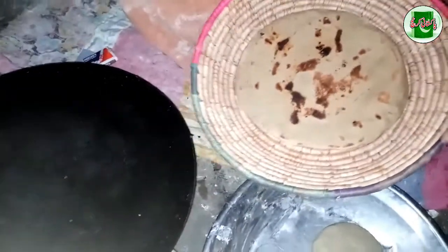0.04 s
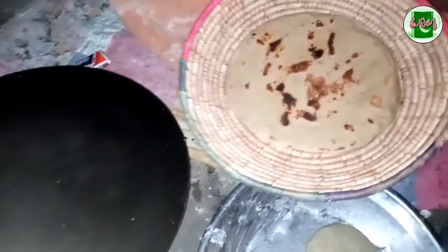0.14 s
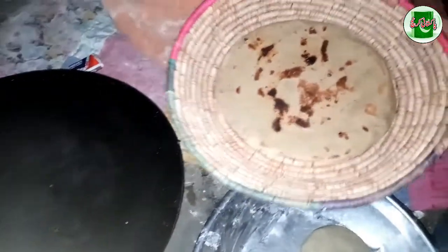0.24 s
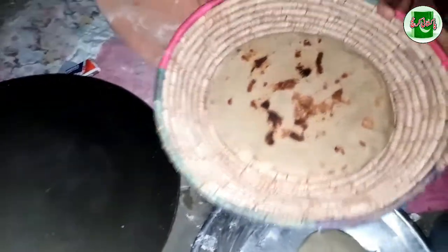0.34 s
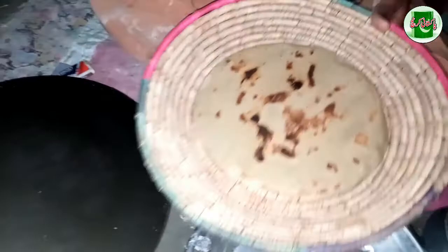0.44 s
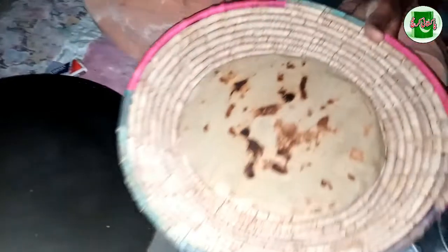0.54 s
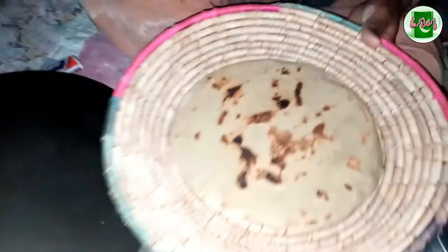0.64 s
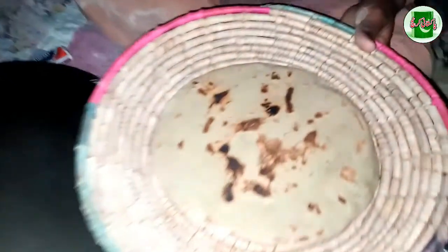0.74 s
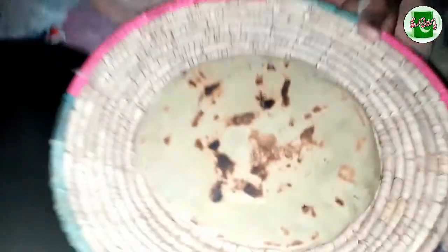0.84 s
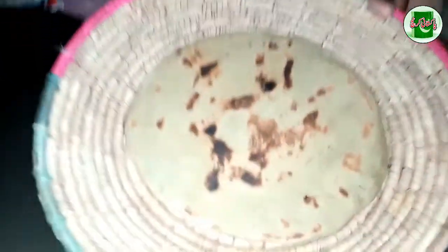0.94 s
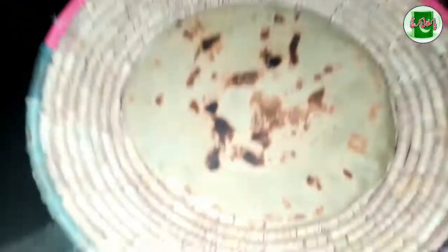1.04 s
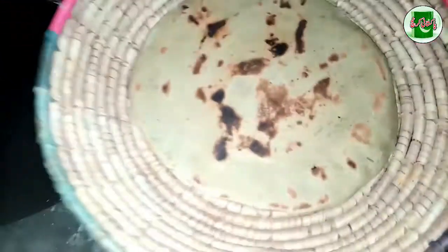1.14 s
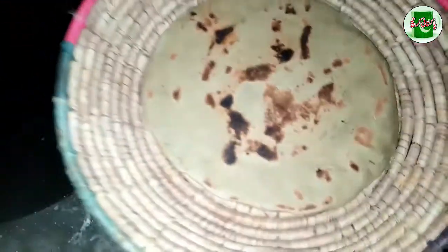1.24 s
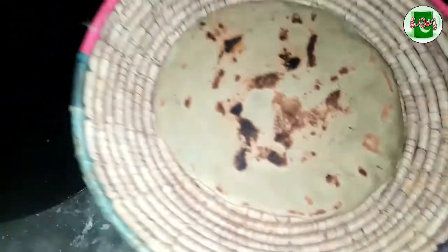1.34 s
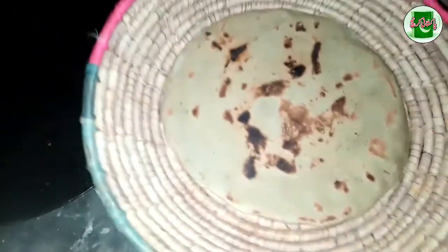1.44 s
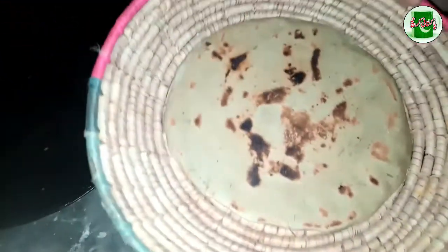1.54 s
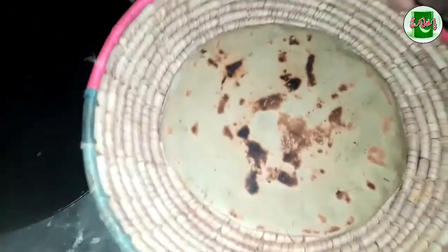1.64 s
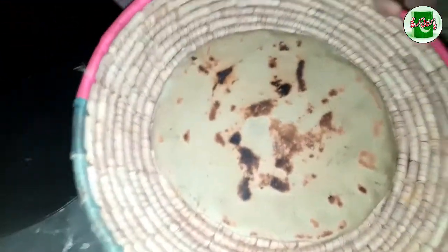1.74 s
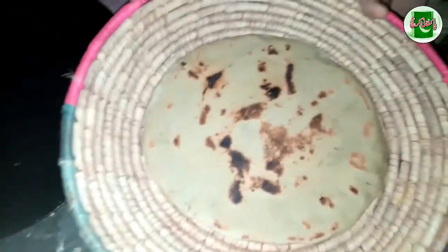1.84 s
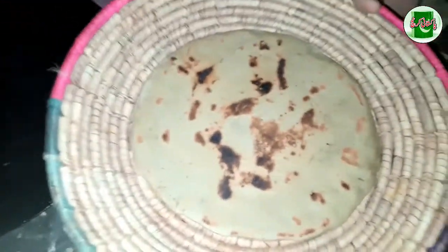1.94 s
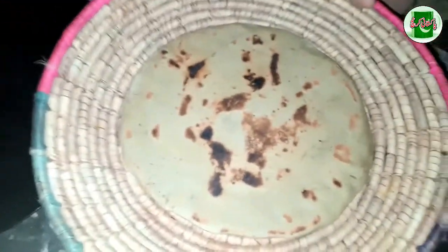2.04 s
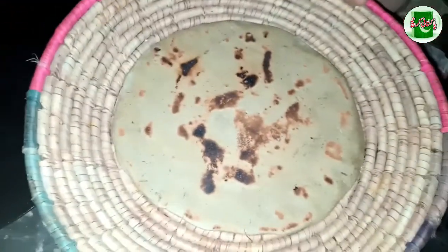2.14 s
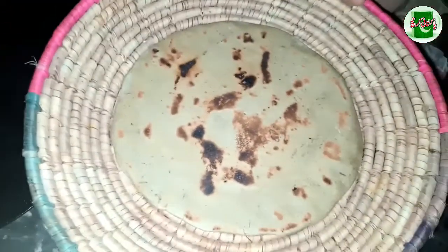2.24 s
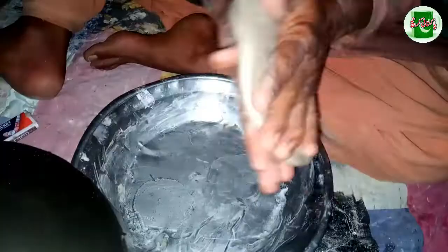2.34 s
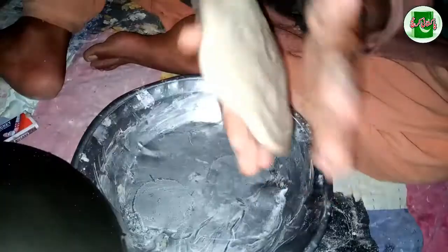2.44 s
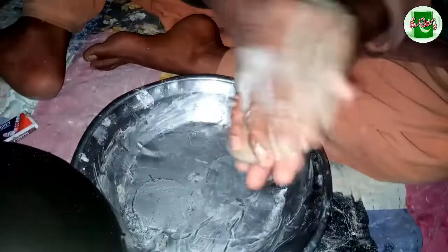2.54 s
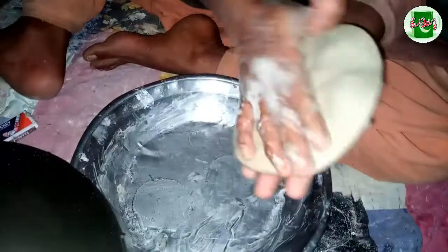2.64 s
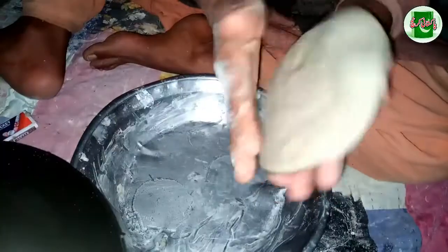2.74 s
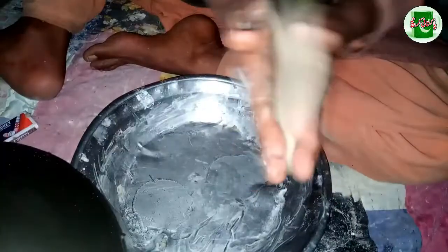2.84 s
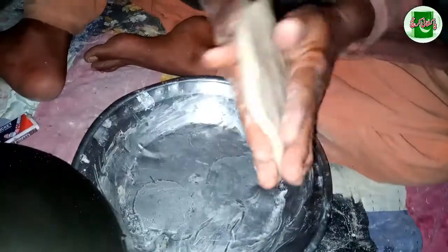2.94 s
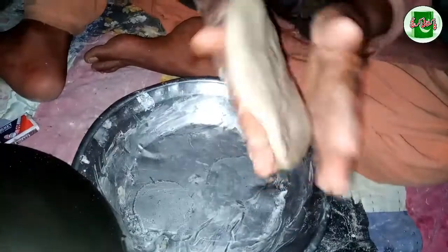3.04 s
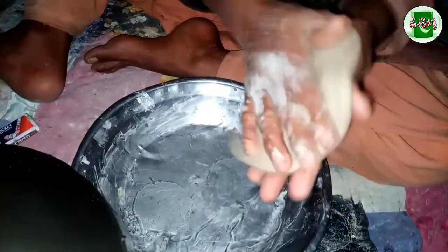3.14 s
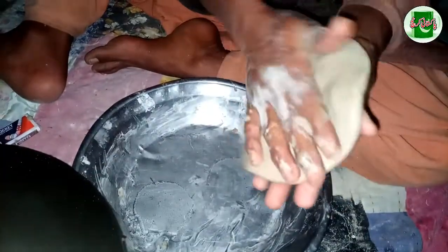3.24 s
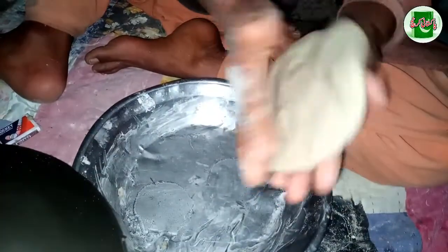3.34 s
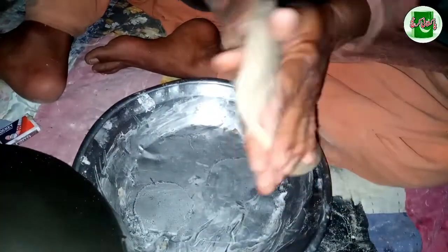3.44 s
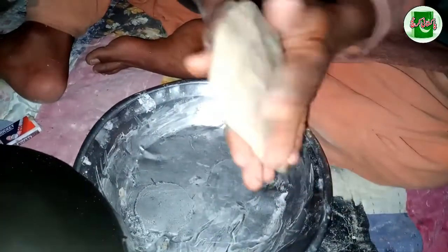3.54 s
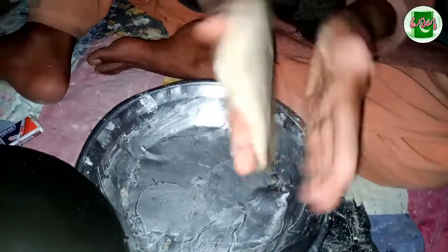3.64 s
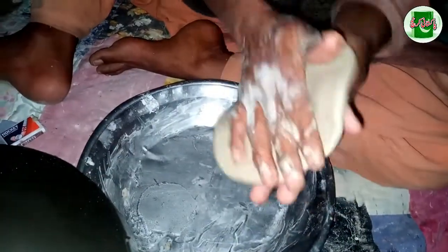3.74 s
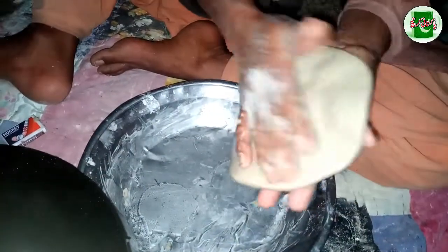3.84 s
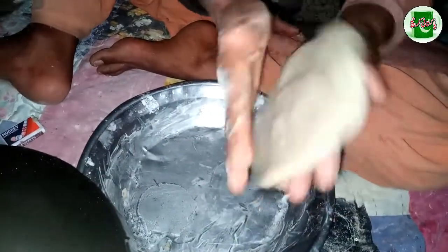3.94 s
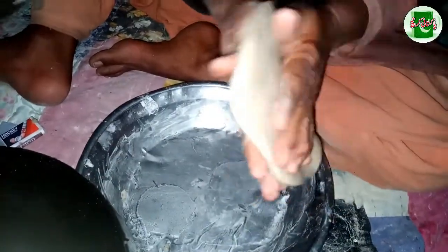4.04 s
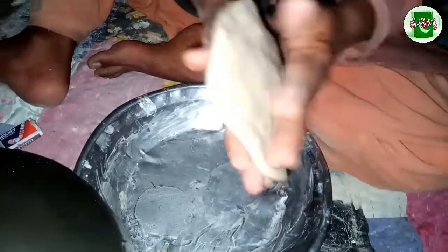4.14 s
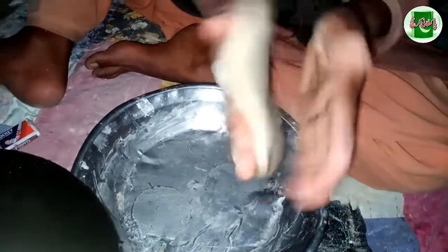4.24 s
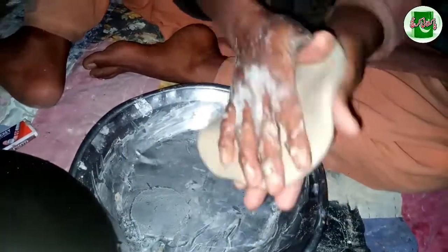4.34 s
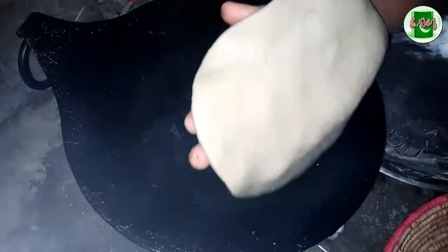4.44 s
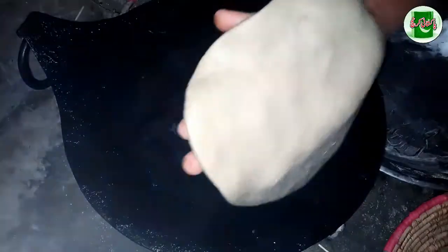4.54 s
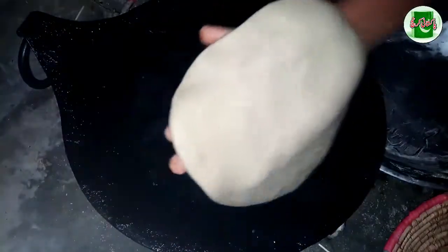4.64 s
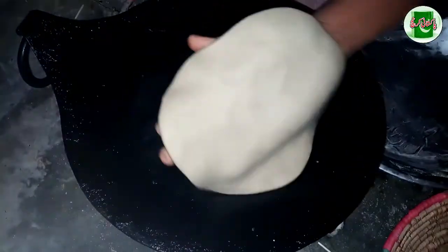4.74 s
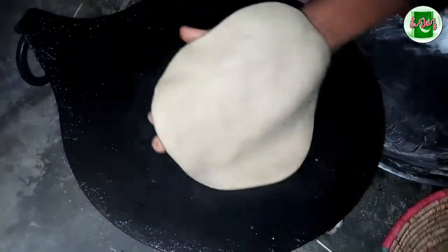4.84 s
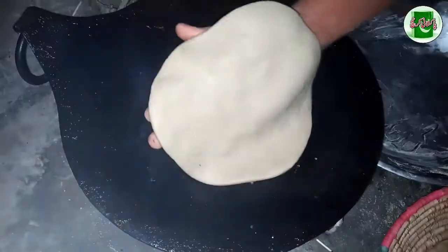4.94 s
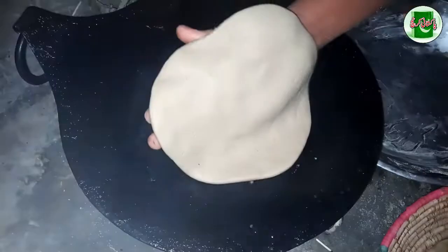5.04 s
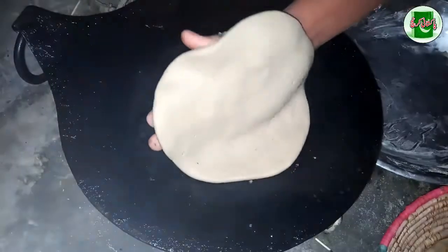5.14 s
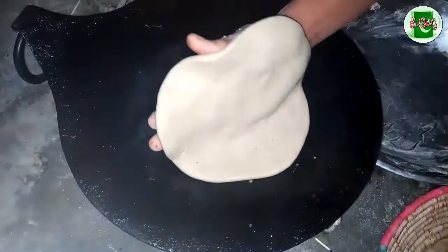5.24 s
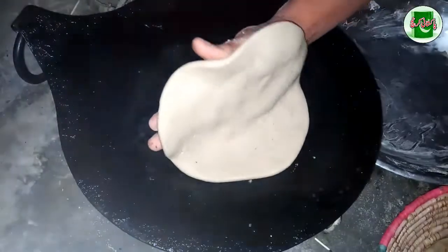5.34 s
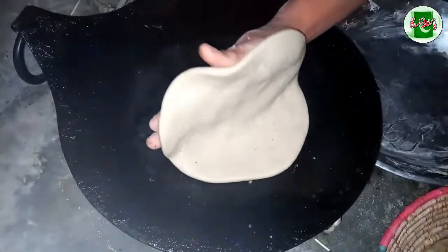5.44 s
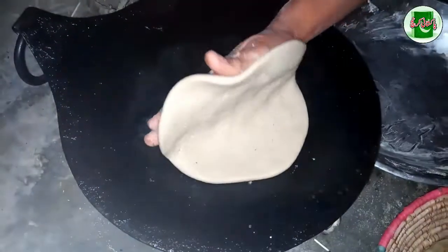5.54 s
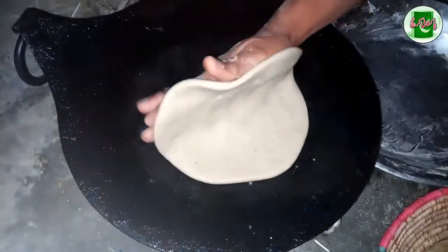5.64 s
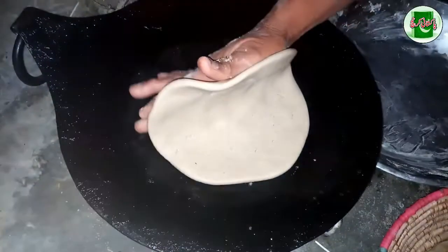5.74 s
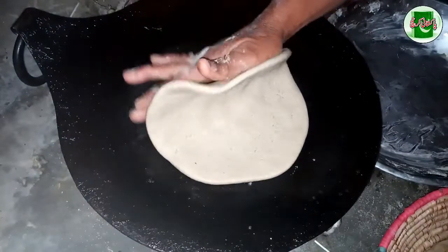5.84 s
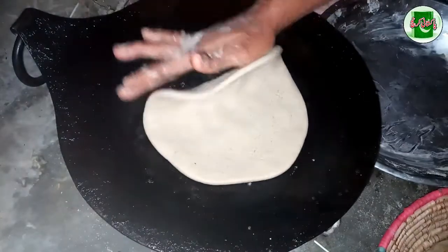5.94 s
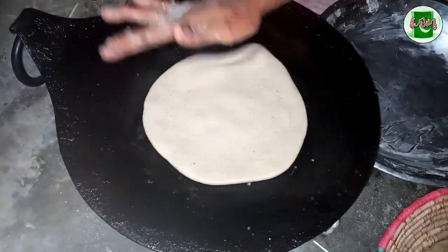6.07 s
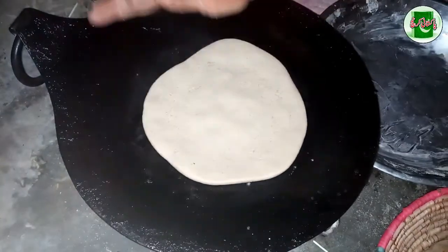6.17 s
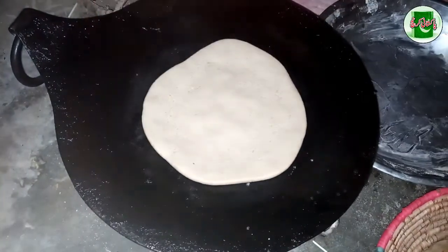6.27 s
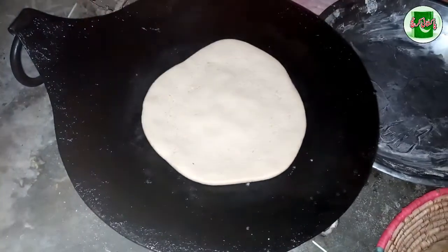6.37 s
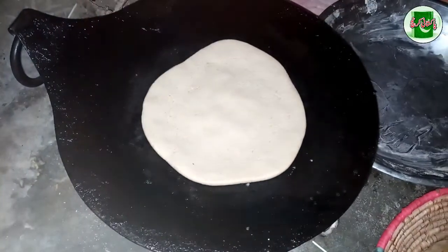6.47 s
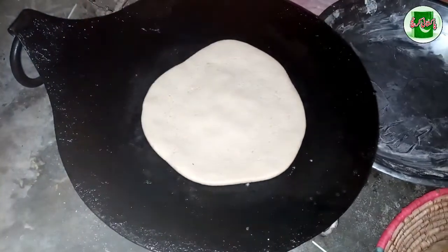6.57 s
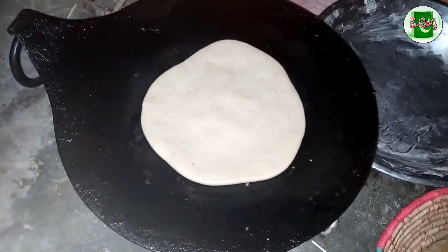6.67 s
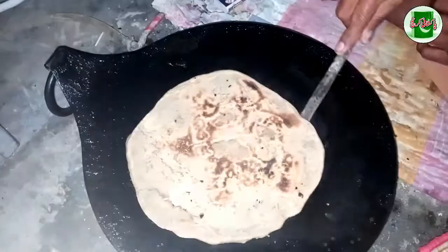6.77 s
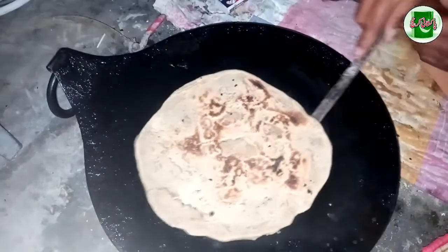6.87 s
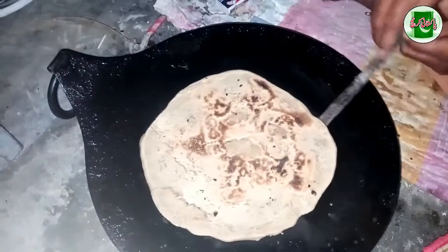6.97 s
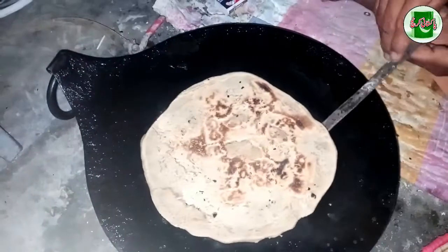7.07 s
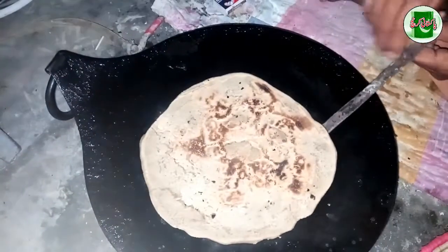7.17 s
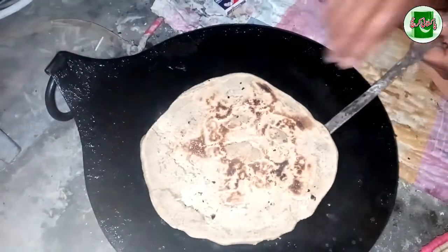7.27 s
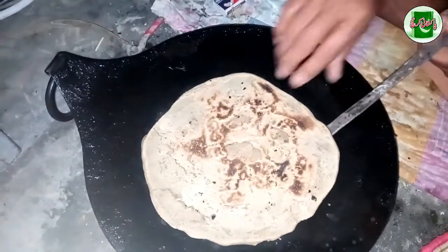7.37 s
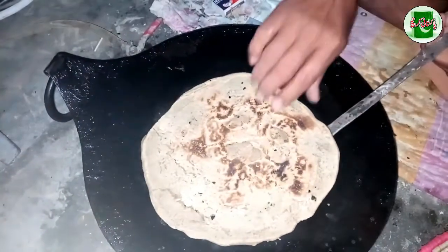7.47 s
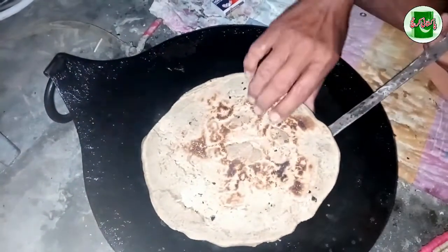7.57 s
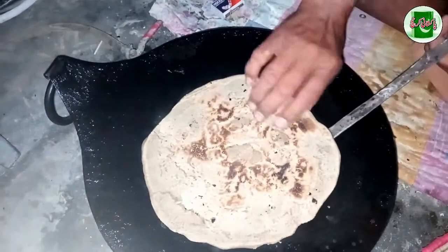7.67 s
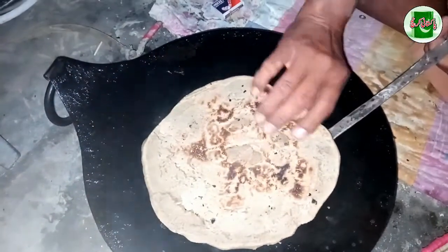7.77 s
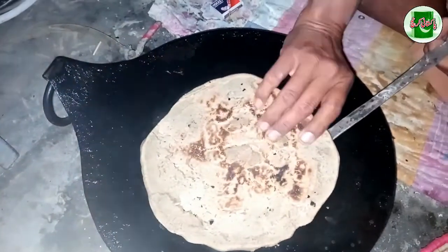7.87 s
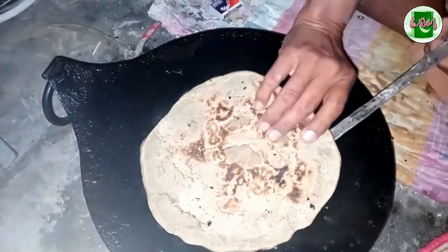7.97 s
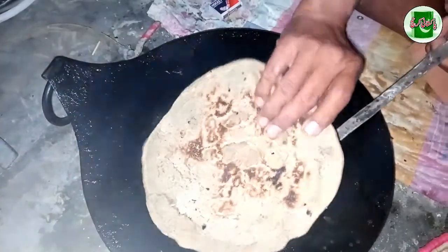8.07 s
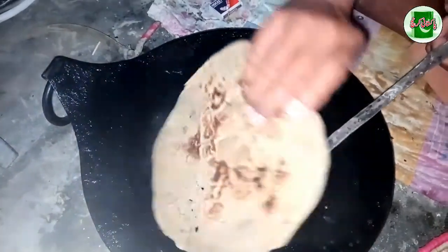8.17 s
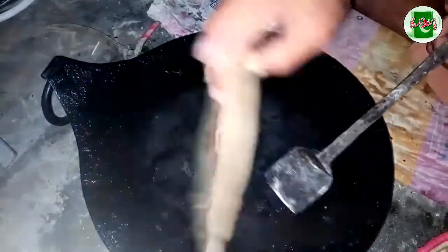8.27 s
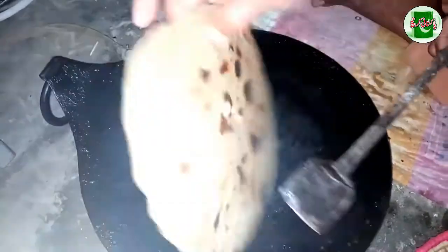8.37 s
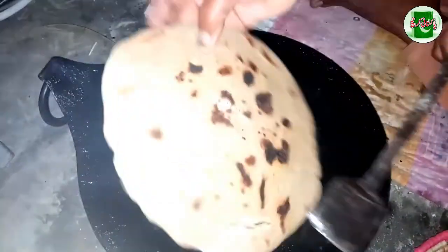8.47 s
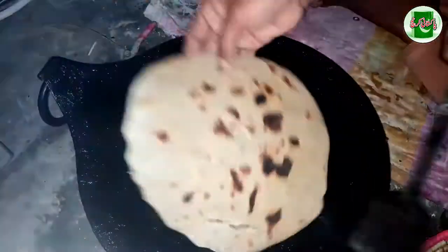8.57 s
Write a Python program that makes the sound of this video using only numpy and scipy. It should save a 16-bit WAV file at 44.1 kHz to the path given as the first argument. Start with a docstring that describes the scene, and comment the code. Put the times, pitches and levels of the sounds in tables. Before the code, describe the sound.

Sharp hollow dough slaps with soft hiss, a swelling then fading sizzle, gritty spatula scrapes ringing on iron, and a closing thump, with birds chirping.

```python
"""A low fire flutters in a walled yard, and small birds chirp: whistles that slide down, with calls far off.
A straw plate rubs the hands as a run of ticks. Dough is slapped from palm to palm: puffs of air, a ringing
pocket and short noise, while a soft hiss opens around each slap. Laid on a hot iron griddle, it sizzles
in tiny bursts. A steel spatula scrapes gritty noise from the iron and makes it ring, dry crust snaps,
and at last the turned bread flops back with a thump."""
import sys
import numpy as np
from scipy import signal
from scipy.fft import rfft, irfft
from scipy.io import wavfile
from scipy.ndimage import map_coordinates

SR = 44100
rng = np.random.default_rng(int(sys.argv[2]) if len(sys.argv) > 2 else 0)


def master_out(mix):
    """Clip the mix to full scale and print it as 16-bit PCM to the path in sys.argv[1]."""
    frames = np.transpose(np.atleast_2d(mix))
    ceiling = np.clip(frames, -1, 1)
    pcm = np.round(ceiling * 32767).astype(np.int16)
    wavfile.write(sys.argv[1], SR, pcm)


N = 379701
TIME = np.arange(N) / SR  # the whole scene, in seconds
AGE = TIME[:SR // 2]  # half a second, the time frame of every short sound


def undb(db):
    """Turn decibels into a gain."""
    return 10 ** (np.asarray(db) / 20)


def unit(x):
    """Scale to an average (rms) strength of 1."""
    return x / np.sqrt(np.mean(x ** 2))


def norm(response):
    """Scale a response so that noise passed through it keeps its power."""
    return response / np.sqrt(np.sum(response ** 2))


def add(track, s, sound):
    """Mix a sound into a track at time s."""
    start = max(int(s * SR), 0)
    track[start:start + len(sound)] += sound[:max(N - start, 0)]


def through(x, response):
    """Pass a sound through an impulse response."""
    return signal.fftconvolve(x, response)[:len(x)]


def colour(x, points, size=4096):
    """Filter with a (f/Hz, level/dB) shape that never acts ahead of time; white noise keeps its power."""
    hz, db = np.transpose(points)
    grid = np.maximum(np.arange(size // 2 + 1) * SR / size, 1)
    # beyond the first and last points the level falls away
    skirts = np.minimum(grid / hz[0], 1) ** 2 * np.minimum(hz[-1] / grid, 1) ** 2
    shape = undb(np.interp(np.log(grid), np.log(hz), db))
    gain = unit(shape * skirts)
    # folding the cepstrum makes the filter respond as early as possible
    cepstrum = irfft(np.log(gain))
    cepstrum[1:size // 2] *= 2
    cepstrum[size // 2 + 1:] = 0
    return through(x, irfft(np.exp(rfft(cepstrum))))


def fade(t60):
    """Steady decay that falls 60 dB in t60 seconds."""
    return np.exp(-np.log(1000) * AGE / t60)


def burst(t60):
    """Noise that dies away."""
    return rng.standard_normal(len(AGE)) * fade(t60)


def walk(rate):
    """Random wandering with a spread near 1: new values at a rate per second, joined by straight lines."""
    knots = np.arange(0, TIME[-1] + 1, 1 / rate)
    return np.interp(TIME, knots, rng.standard_normal(len(knots)))


def grains(rate, spread_db):
    """Tiny clicks at a rate per second, a few much larger than the rest."""
    sizes = undb(spread_db * np.minimum(rng.exponential(size=N), 5))
    happens = rng.random(N) < rate / SR
    return unit(happens * sizes * rng.choice([-1, 1], N))


def flicker(points, depth_db, rate, count=12):
    """Noise of a (f/Hz, level/dB) shape in which each band wavers in level on its own."""
    edges = np.geomspace(points[0][0] / 2, points[-1][0] * 2, count + 1)
    total = np.zeros(N)
    for pair in zip(edges, edges[1:]):
        band_filter = signal.butter(2, pair, "band", fs=SR, output="sos")
        band = signal.sosfilt(band_filter, rng.standard_normal(N))
        total += band * undb(depth_db * walk(rate))
    return unit(colour(total, points))


def modes(table):
    """Ring of a struck object: one dying sine for each way it vibrates."""
    return sum(undb(db) * np.sin(2 * np.pi * hz * AGE) * fade(t60) for hz, t60, db in table)


def stroke(s, length, attack_s, release_s):
    """Gain of one movement: it builds, holds, and then falls 60 dB in the release time."""
    age = TIME - s
    release = np.clip((age - length) / release_s, 0, 2)
    return np.clip(age / attack_s, 0, 1) * np.exp(-np.log(1000) * release)


def strokes(table, attack_s, release_s):
    """Gain over time of a table of movements."""
    return sum(undb(db) * stroke(s, length, attack_s, release_s) for s, length, db in table)


def nearby(x, reach_s, count=6):
    """A few distinct reflections from the ground and things close by."""
    taps = np.zeros(len(AGE))
    delays_s = rng.uniform(.1, 1, count) * reach_s
    taps[(delays_s * SR).astype(int)] = rng.choice([-1, 1], count)
    return through(x, norm(taps))


def echo(x, t60, gap_s):
    """Blurred return from the yard walls, scaled to keep the power of noise; the highest part dies sooner."""
    lowpass = signal.butter(4, 7000, fs=SR, output="sos")
    tail = signal.sosfilt(lowpass, burst(t60)) + .3 * burst(t60 / 2)
    tail = tail * np.clip(AGE / gap_s - 1, 0, 1)  # silent for the gap, then builds over the same time
    return through(x, norm(tail))


def thump(width_s, rebound=0.36, low_hz=160):
    """Air pushed from between two soft faces: sharp suction, slower rebound; too small to radiate deep bass."""
    u = AGE / width_s
    pulse = -u * np.exp(1 - u) + rebound ** 2 * u * np.exp(1 - rebound * u)
    return signal.sosfilt(signal.butter(3, low_hz, "high", fs=SR, output="sos"), pulse)


# tone of the fire: f/Hz, level/dB
FLAME = [(60, -3), (110, -7.5), (160, 3), (220, -11), (330, -9.5)]
# blurred tone of faint far sounds: f/Hz, level/dB
FAR_BLUR = [(450, 0), (2000, -3)]
# tone of the still air in the yard: f/Hz, level/dB
YARD = [(50, -3), (130, -4.5), (500, -18), (2600, -21.5), (5200, -17), (8000, -32.5), (16000, -34)]
FIRE_DB, FAR_DB, YARD_DB = -74.5, -77, -71
FLARE_DB, FLARE_S, FLARE_LENGTH_S = -72.5, 2.275, 4.73  # added strength of the fire for a while


def background():
    """The fire flutters under the griddle; faint far sounds come and go over the still air of the yard."""
    flare = undb(FLARE_DB) * stroke(FLARE_S, FLARE_LENGTH_S, attack_s=0.034, release_s=0.68)
    fire = (undb(FIRE_DB) + flare) * flicker(FLAME, depth_db=6.5, rate=14)
    far = undb(FAR_DB) * flicker(FAR_BLUR, depth_db=7.5, rate=9, count=30)
    air = undb(YARD_DB + walk(3.9)) * colour(rng.standard_normal(N), YARD)
    return fire + far + air


# a near bird's falling chirps: t/s, level/dB
CHIRPS = [(.175, -72), (.568, -51), (.84, -45), (1.15, -47), (1.56, -48.5), (2.058, -51), (2.66, -53.5)]
# the near bird's hooked calls, held and then dropped: t/s, level/dB
HOOKS = [(4.400, -47), (4.688, -47), (5.000, -46.5), (5.368, -50), (6.268, -52)]
# a second bird's thin, high peeps: t/s, level/dB
PEEPS = [(.47, -67), (1.42, -64.5), (1.795, -65.5), (2.165, -69.5), (2.44, -60.5), (2.701, -58),
         (3.039, -59), (3.33, -58), (3.629, -59)]
# a third bird's lower slurs: t/s, level/dB
SLURS = [(.385, -63.5), (2.755, -54), (3.11, -56), (3.39, -52.5), (3.5, -61.5), (3.78, -63), (4.02, -56),
         (4.375, -58.5), (4.935, -56.5)]
# shape of each kind of call: length/s, start f/Hz, end f/Hz,
# bend (1 falls straight, 3 is held then dropped), loudness near the end (0-1)
CHIRP = (.118, 4950, 2600, 1.9, 0.45)
HOOK = (.096, 5500, 2755, 3.1, 0.58)
PEEP = (.105, 6130, 5220, 1.8, 0.45)
SLUR = (.125, 4450, 3000, 1.3, 0.2)
HOOK_OCTAVE_DB = 8  # the octave against the whistle, at the low end of a hooked call


def birds(waver=.021, flutter_db=5, echo_db=-1, near_db=-9):
    """Fluttering whistles swell as they slide down; hooked ones break into the octave at the low end."""
    out = np.zeros(N)
    wobble = waver * walk(900)
    flutter = undb(flutter_db * walk(220))
    kinds = [(CHIRPS, CHIRP), (HOOKS, HOOK), (PEEPS, PEEP), (SLURS, SLUR)]
    for calls, (length, start_hz, end_hz, bend, end_level) in kinds:
        u = np.linspace(0, 1, int(length * SR))  # progress through the call
        loudness = np.interp(u, [0, .22, .36, .58, .9, 1], [0, .25, .75, 1, end_level, 0])
        for s, db in calls:
            # pure at first, rougher as it falls
            unsteady = 1 + 2 * u ** (bend / 2) * wobble[int(s * SR):][:len(u)]
            hz = (start_hz + (end_hz - start_hz) * u ** bend) * unsteady
            phase = 2 * np.pi * np.cumsum(hz) / SR
            whistle = np.sin(phase)
            if calls is HOOKS:
                low_end = 1 / (1 + (hz / 3250) ** 30)  # opens once the pitch is below 3250 Hz
                whistle = whistle + undb(HOOK_OCTAVE_DB) * low_end * np.sin(2 * phase)
            add(out, s, undb(db) * loudness * whistle)
    out = out * flutter
    close = undb(near_db) * nearby(out, reach_s=0.05)
    return out + close + undb(echo_db) * echo(out, t60=0.36, gap_s=0.005)


# soft low coos from far away: t/s, f/Hz, level/dB
COOS = [(.49, 339, -66), (4.03, 287, -54), (4.68, 335, -65), (4.999, 326.6, -61), (5.12, 344, -62)]
# faint hoarse calls of a far bird: t/s, level/dB
HOOTS = [(6.96, -69), (7.46, -68), (7.62, -63), (7.825, -64.5), (8.015, -66), (8.08, -61), (8.28, -62)]
# thin, wavering tones from far away: t/s, length/s, f/Hz, level/dB
FAR_TONES = [(1.044, 0.44, 1305, -71.5), (1.08, 0.46, 2144, -70), (1.427, 0.39, 1290, -71),
             (6.597, 0.13, 1047, -67)]
COO_S, HOOT_S, HOOT_HZ = 0.085, 0.044, 850  # lengths of a coo and a hoot; pitch of the hoots


def distance(rasp=0.222, waver=.06, coo_waver=0.036):
    """Far hoarse calls, soft low coos and thin wavering tones, heard only by way of the walls."""
    out = np.zeros(N)
    hoarse, wavering = rasp * walk(500), walk(70)
    calls = [(s, HOOT_S, HOOT_HZ, db, hoarse) for s, db in HOOTS]
    calls += [(s, COO_S, hz, db, coo_waver * wavering) for s, hz, db in COOS]
    calls += [(*row, waver * wavering) for row in FAR_TONES]
    for s, length, hz, db, unsteady in calls:
        u = np.linspace(0, 1, int(length * SR))
        pitch = hz * (1 + unsteady[int(s * SR):][:len(u)])
        tone = np.sin(2 * np.pi * np.cumsum(pitch) / SR)
        add(out, s, undb(db) * np.sin(np.pi * u) * tone)
    return echo(out, t60=0.26, gap_s=0.0021)


# the straw plate slides through the hands: t/s, length/s, level/dB
STRAW = [(.5, 0.43, -61.5), (.98, 0.21, -56)]
# tone of the dry stalks: f/Hz, level/dB
STALKS = [(300, -2.5), (900, -9), (1500, -1.5), (2700, -2), (3800, 9.5), (6500, 7.5), (8500, -16),
          (15400, -17)]
STRAW_ATTACK_S, STRAW_RELEASE_S = 0.15, 0.79


def straw():
    """Dry stalks rub and tick against the fingers: dense clicks with a wavering level."""
    slide = strokes(STRAW, STRAW_ATTACK_S, STRAW_RELEASE_S) * undb(2.0 * walk(31.06))
    return colour(slide * grains(3200, spread_db=0.5), STALKS)


# slaps of dough, on the palm and last on the iron:
# t/s, air thump level/dB, air pocket f/Hz, pocket level/dB, smack level/dB, skin crack level/dB
PATS = [(2.5470, -29.5, 1720, -30, -30, -21.5), (2.8195, -11, 693, -13, -20, -14),
        (3.1135, -12, 603, -18, -27.5, -20), (3.3940, -21, 815, -16.5, -24, -33),
        (3.6857, -18, 1265, -11, -21.5, -16), (3.9834, -14.5, 480, -18.5, -27.5, -26),
        (4.2828, -14.5, 1304, -13.5, -18, -25), (6.0872, -33.5, 942, -21, -32.5, -70)]
# the fingers land ahead of the palm and press on until it follows: t/s
FINGERS = [2.5380, 2.8159, 3.1106, 3.3860, 3.6826, 3.979]
# tone of the smack: f/Hz, level/dB
SMACK = [(150, -19), (400, -3.5), (700, 1.5), (1800, 1), (4000, -9.5), (7000, -20.5), (12000, -32)]
# tone of the sharp crack: f/Hz, level/dB
CRACK = [(800, -28.5), (2400, -6), (3800, 4), (5500, -0.5), (7000, -12), (8500, -24.5), (13500, -20.5),
         (15300, -11.5)]
PATTING_FROM_S, PATTING_TO_S = 2.324, 4.293
THUMP_CYCLES = 0.39  # width of the thump in periods of the air pocket: a bigger pocket is lower and slower
POCKET_T60, POCKET_RISE = .014, 0.23  # ring time in s; its pitch rises by up to this share as it is squeezed
WALL_S, BOOM_HZ, BOOM_T60 = .0428, 150.6, 0.32  # the nearest wall answers each slap; the yard booms
SAG_S, SAG_DB = 3.2, -33  # the sagging dough drops on the wrist
LAST_FLAP_S = PATS[-1][0]  # the last of the dough lands on the iron


def pats(finger_db=-30, finger_crack_db=-3, near_db=-9, wall_db=-23, echo_db=-14.0,
         snap_db=7, snap_s=.0001, boom_db=-35):
    """Fingers land first; then the palm thumps, squeezes a ringing pocket of air and smacks on the dough."""
    out = np.zeros(N)
    for s in FINGERS:
        lead_s = min(row[0] for row in PATS if row[0] > s) - s
        # full until the palm lands, then gone after the same time again
        press = burst(0.08) * np.clip(1 - (AGE - lead_s) / lead_s, 0, 1)
        touch = colour(press, SMACK) + undb(finger_crack_db) * colour(press, CRACK)
        add(out, s, undb(finger_db) * touch)
    for s, thump_db, hollow_hz, hollow_db, smack_db, crack_db in PATS:
        pocket = fade(POCKET_T60)
        pocket_hz = hollow_hz * (1 + POCKET_RISE * (1 - pocket))
        hollow = np.sin(2 * np.pi * np.cumsum(pocket_hz) / SR) * pocket
        skin = undb(smack_db) * colour(burst(0.039), SMACK) + undb(crack_db) * colour(burst(0.021), CRACK)
        slap = skin + undb(smack_db + snap_db) * thump(snap_s)
        air = undb(hollow_db) * hollow + undb(thump_db) * thump(THUMP_CYCLES / hollow_hz)
        direct = slap + air
        sound = direct + undb(near_db) * nearby(direct, reach_s=0.0046)
        sound = sound + undb(wall_db) * np.roll(direct, int(WALL_S * SR))
        sound = sound + undb(echo_db) * echo(slap + air / 2, t60=0.31, gap_s=0.007)
        sound = sound + modes([(BOOM_HZ, BOOM_T60, thump_db + boom_db)])
        if s < PATTING_TO_S:  # the patting breaks off abruptly, echo and all
            sound = sound * np.clip(.5 + (PATTING_TO_S - s - AGE) / .004, 0, 1)
        add(out, s, sound)
    add(out, PATTING_FROM_S, undb(-53.5) * colour(burst(0.23), SMACK))  # the hand first brushes the dough
    add(out, SAG_S, undb(SAG_DB) * thump(0.0023))
    return out


# tone of the hiss: f/Hz, level/dB
HISS = [(400, -13), (2200, -1), (5000, 5.5), (7000, -1.5), (8500, -16)]
# bright top of the hiss: f/Hz, level/dB
TOP_HISS = [(9000, -11.5), (15400, -3.5)]


def hiss(db=-56, hold_s=0.175, top_db=-60, weak_db=-8):
    """A soft hiss opens around each slap, holds briefly and sinks; its bright top alternates strong and weak."""
    openings = [(PATTING_FROM_S, hold_s / 2)] + [(s, hold_s) for s in FINGERS]
    gains = [stroke(s, length, attack_s=0.0038, release_s=.12) for s, length in openings]
    top_gain = sum(gains[1::2]) + undb(weak_db) * sum(gains[::2])
    body = undb(db) * sum(gains) * colour(rng.standard_normal(N), HISS)
    top = undb(top_db) * top_gain * colour(rng.standard_normal(N), TOP_HISS)
    return (body + top) * undb(2.5 * walk(40))


# tone of the frying: f/Hz, level/dB
FRY = [(3100, -22.5), (4000, -5), (5300, -0.5), (7300, -4.5), (9500, -22), (12500, -8), (15200, -3.5)]
# tone of the steam: f/Hz, level/dB
STEAM = [(650, -10.5), (1300, -1.5), (2100, 0.5), (2800, -11)]
# bursting droplets, before they are brightened: t/s, level/dB
SPITS = [(5.676, -30.5), (5.7477, -31), (5.9562, -34), (6.276, -35), (6.505, -39), (6.542, -37.5)]
LAY_S, FLAT_S = 4.7, 5.323  # the dough first touches the iron; most of it lies flat
# sizzle once flat; how far below that it starts at first touch; how fast the underside dries
FRY_DB, TOUCH_DB, DRY_DB_PER_S = -46, -12.5, 5
SEAL_DB, SEALED_DB_PER_S = -6.5, 12.5  # the last flap shuts the sizzle in: a drop, then an extra decline
STEAM_DB, STEAM_RISE_DB_PER_S, STEAM_FALL_DB_PER_S = -54, 58.5, 14  # steam squeezed from under the dough
STEAM_SINK = .82  # its pitch falls to this share as the dough closes over it
CRACKLE_DB, CRACKLE_PER_S = -57, 55  # small droplets pop once the dough lies flat (level before brightening)


def sizzle(attack_s=0.13, length_s=2.06):
    """Moisture boils off in tiny bursts: more as the dough spreads, sparser once the underside has dried."""
    contact = stroke(LAY_S, length_s, attack_s, release_s=0.041)
    # seconds still to go before flat, since flat, and since sealed
    spreading, drying = np.maximum(FLAT_S - TIME, 0), np.maximum(TIME - FLAT_S, 0)
    sealed = np.maximum(TIME - LAST_FLAP_S, 0)
    fry_db = FRY_DB + TOUCH_DB * spreading / (FLAT_S - LAY_S) - DRY_DB_PER_S * drying
    fry_db = fry_db + SEAL_DB * (sealed > 0) - SEALED_DB_PER_S * sealed
    rate = np.interp(TIME, [5.9, 6.3], [7000, 3500])  # bursts per second
    boil = unit(grains(rate, spread_db=3.0) / np.sqrt(rate)) + .5 * rng.standard_normal(N)
    fry = undb(fry_db + 2.3 * walk(49)) * contact * unit(boil)

    steam_db = STEAM_DB - STEAM_RISE_DB_PER_S * spreading - STEAM_FALL_DB_PER_S * drying
    sinking = np.interp(TIME, [FLAT_S, FLAT_S + .5], [1, STEAM_SINK])
    # reading the noise more slowly lowers its pitch
    steam = map_coordinates(flicker(STEAM, depth_db=5.0, rate=24), [np.cumsum(sinking)], mode="mirror")
    steam = undb(steam_db) * contact * steam

    crackle_gain = undb(CRACKLE_DB - 2 * DRY_DB_PER_S * drying) * contact * (TIME > FLAT_S)
    pops = crackle_gain * grains(CRACKLE_PER_S, spread_db=2.0)
    for s, db in SPITS:
        add(pops, s, undb(db) * burst(0.0032))
    bright_pops = np.gradient(pops) + np.diff(pops, prepend=0) / 2  # pops are brighter than the boil
    return colour(fry + bright_pops, FRY) + steam


# pushes of the spatula under the bread: t/s, length/s, level/dB
SCRAPES = [(6.755, 0.057, -51.5), (6.815, 0.074, -42), (6.96, 0.041, -53), (7.90, 0.065, -54),
           (8.17, 0.071, -65.5)]
# gritty tone of the baked crust: f/Hz, level/dB
CRUST = [(250, -16), (1050, -16), (1550, -0.5), (2700, -4.5), (5600, 1.5), (8300, -17), (15500, -28.5)]
# the blade catches on the iron: t/s, level/dB
CATCHES = [(6.765, -44), (6.828, -34), (7.941, -31)]
# ring of the griddle with the spatula resting on it: f/Hz, time to fall 60 dB/s, level/dB
IRON = [(313, 0.21, 3.5), (417, 0.31, -5), (791, 0.11, 1), (1443, 0.17, -8), (1520, 0.17, -5.5),
        (1860, 0.13, -7), (2076, 0.19, -8.5), (2303, 0.15, -13)]
# the dragging blade makes the iron sing: t/s, length/s, level/dB
SINGS = [(7.94, 0.13, -64), (8.185, 0.081, -59.5)]
SCRAPE_ATTACK_S, SCRAPE_RELEASE_S = 0.012, 0.12
SING_HZ, SING_WAVER = 1486, .035  # pitch, and the share by which it wavers
FLOP_S = 8.5845  # the turned bread lands


def griddle(rub_db=-1, ring_db=-7, flop_db=-12, flop_ring_db=-30, flop_smack_db=-27):
    """Gritty scraping and small catches ring the iron; at last the bread lands flat on it."""
    ring = modes(IRON)
    push = strokes(SCRAPES, SCRAPE_ATTACK_S, SCRAPE_RELEASE_S)
    rub = push * undb(rub_db + 2 * walk(60)) * grains(5000, spread_db=2.0)
    for s, db in CATCHES:
        add(rub, s, undb(db) * burst(0.0057))
    bright = np.diff(ring, 2)  # hard, brief contacts favour the high modes
    out = colour(rub, CRUST) + undb(ring_db) * through(rub, norm(bright))
    sing = np.sin(2 * np.pi * np.cumsum(SING_HZ * (1 + SING_WAVER * walk(200))) / SR)
    out = out + strokes(SINGS, SCRAPE_ATTACK_S, release_s=0.24) * undb(2 * walk(60)) * sing
    out = out + undb(-9.5) * nearby(out, reach_s=.012)
    flop = undb(flop_db) * thump(0.00038) + undb(flop_ring_db) * ring
    flop = flop + undb(flop_smack_db) * colour(burst(0.025), SMACK)
    flop = flop + undb(-33.5) * colour(burst(0.14), CRUST)
    add(out, FLOP_S, flop)
    add(out, 7.54, undb(-57) * modes(IRON[5:]))  # a light touch of the blade wakes only the high modes
    add(out, LAST_FLAP_S, undb(-46.5) * modes(IRON[:2]))  # the last flap of dough wakes only the low modes
    return out + undb(-10.0) * echo(out, t60=0.36, gap_s=0.0021)


# the dry crust rustles as it shifts: t/s, length/s, level/dB
RUSTLES = [(7.19, 0.098, -59), (7.30, 0.043, -52), (8.0, 0.23, -60)]
# tone of the rustling flakes: f/Hz, level/dB
FLAKES = [(3400, -12), (4600, 4.5), (6000, 0.5), (8300, -20.5)]
# flakes of crust snap: t/s, level/dB
SNAPS = [(7.322, -38), (8.081, -34), (8.102, -34), (8.121, -39)]


def crust(ring_db=-13):
    """Dry flakes of the baked bread crackle and snap; the crackle makes the iron ring faintly."""
    rustle = strokes(RUSTLES, attack_s=0.049, release_s=0.17) * grains(1200, spread_db=2.0)
    snaps = np.zeros(N)
    for s, db in SNAPS:
        add(snaps, s, undb(db) * burst(0.004))
    ringing = through(rustle, norm(np.diff(modes(IRON), 2)))
    return colour(rustle, FLAKES) + colour(snaps, CRACK) + undb(ring_db) * ringing


def scene():
    """All the sounds of the yard added together, in one channel."""
    yard = background() + birds() + distance()
    handling = straw() + pats() + hiss()
    baking = sizzle() + griddle() + crust()
    return (yard + handling + baking)[None]


TOP_HZ = 16000


def record(dry):
    """A steep filter takes away the very top of the sound."""
    return signal.sosfilt(signal.ellip(10, .2, 70, TOP_HZ, fs=SR, output="sos"), dry)


dry = scene()
out = record(dry)
master_out(out)
```